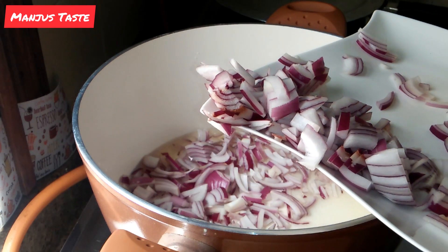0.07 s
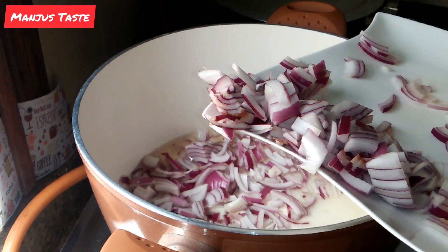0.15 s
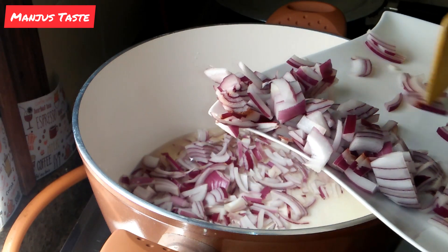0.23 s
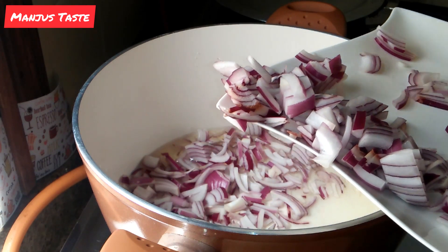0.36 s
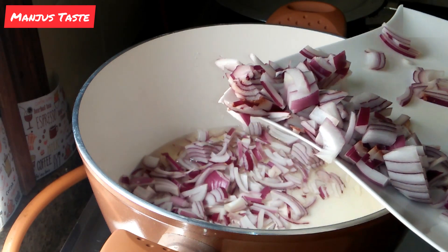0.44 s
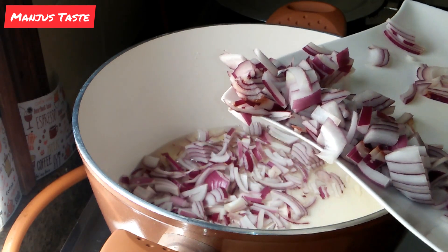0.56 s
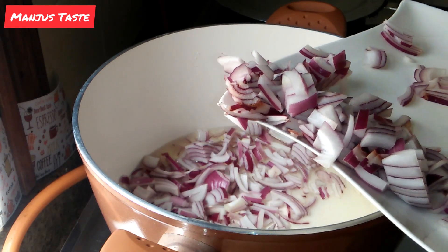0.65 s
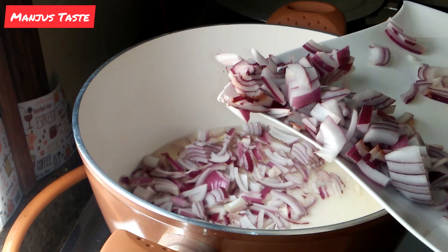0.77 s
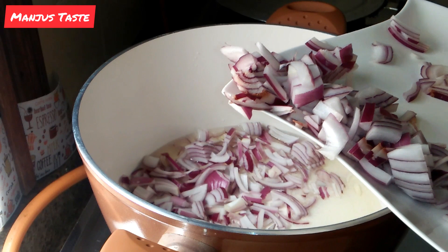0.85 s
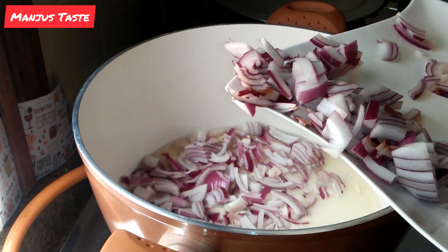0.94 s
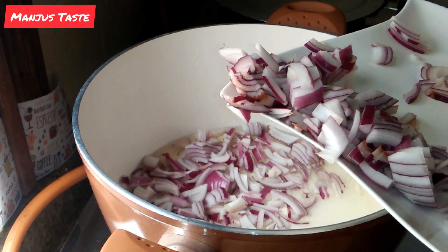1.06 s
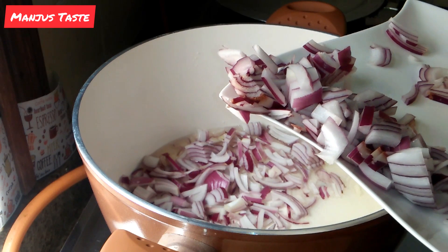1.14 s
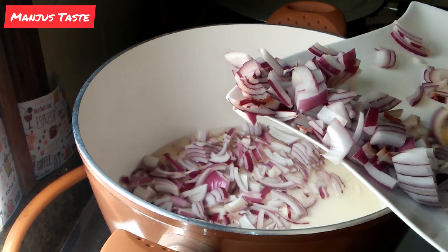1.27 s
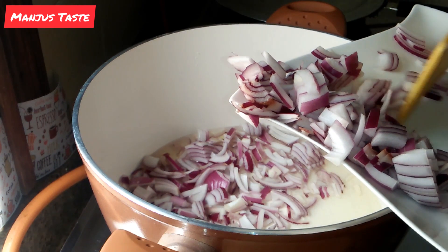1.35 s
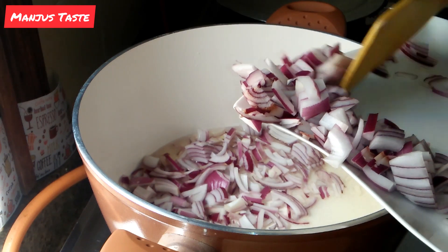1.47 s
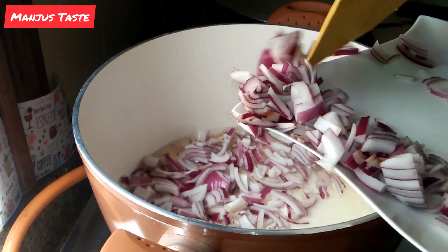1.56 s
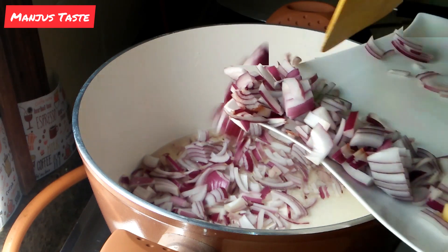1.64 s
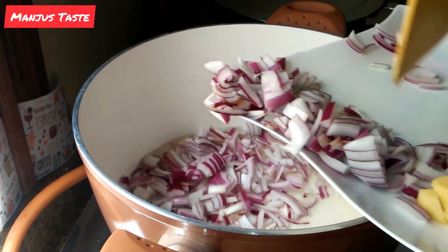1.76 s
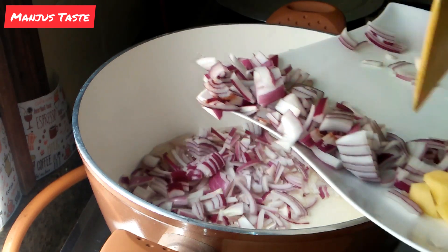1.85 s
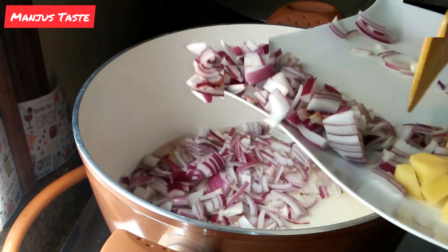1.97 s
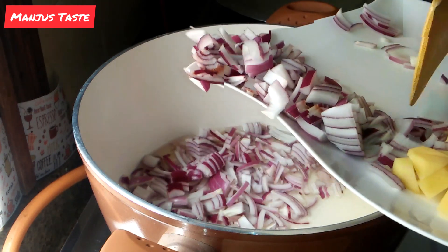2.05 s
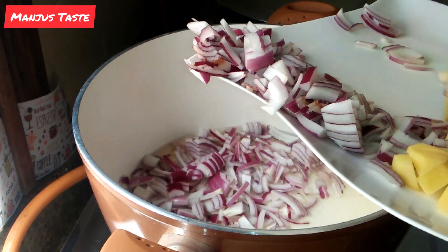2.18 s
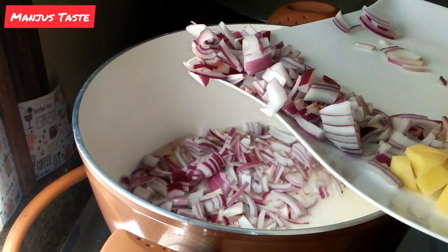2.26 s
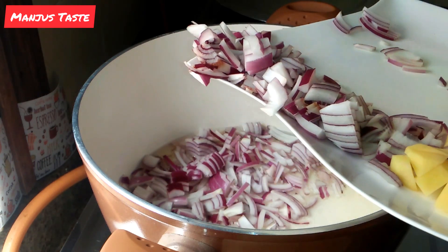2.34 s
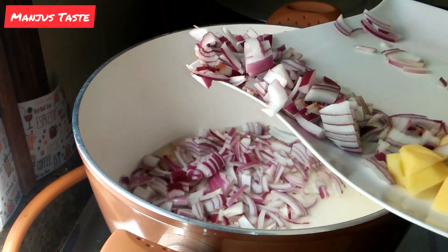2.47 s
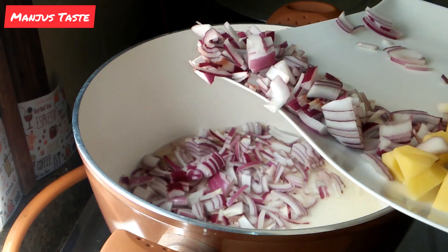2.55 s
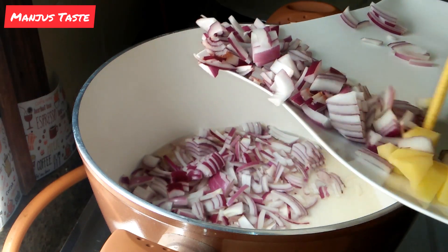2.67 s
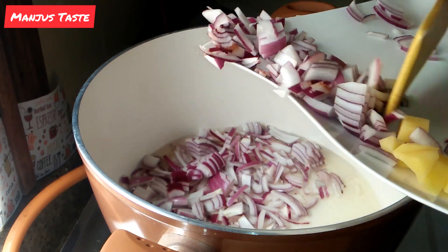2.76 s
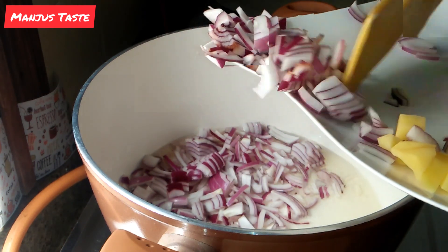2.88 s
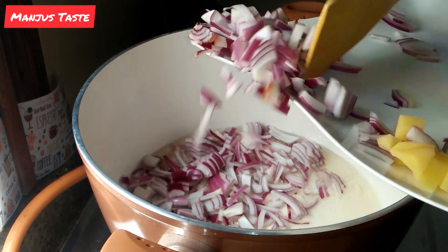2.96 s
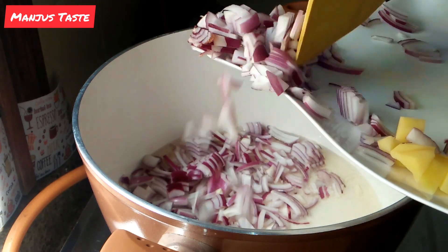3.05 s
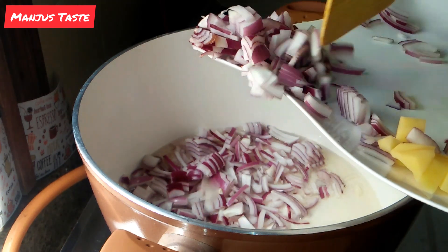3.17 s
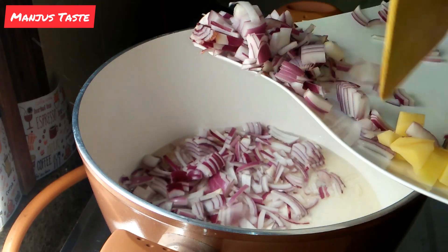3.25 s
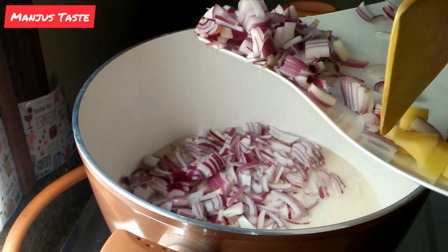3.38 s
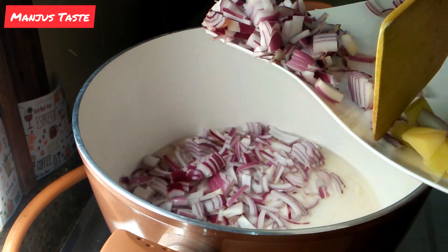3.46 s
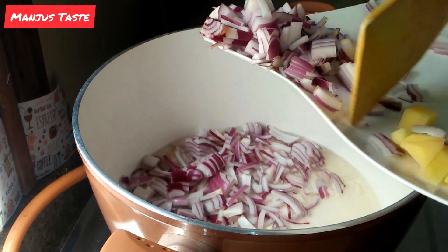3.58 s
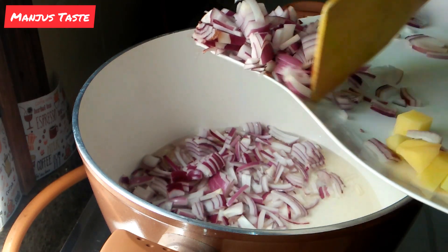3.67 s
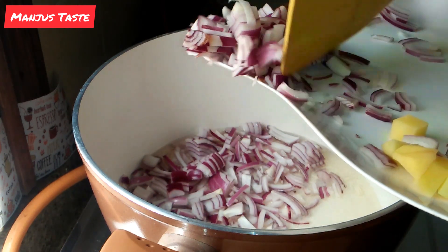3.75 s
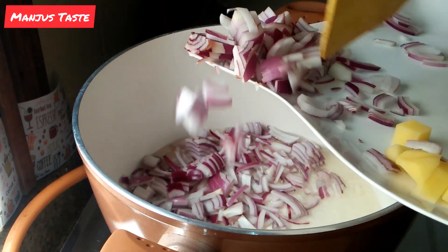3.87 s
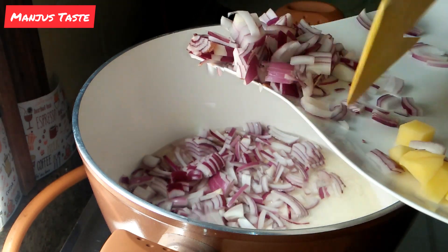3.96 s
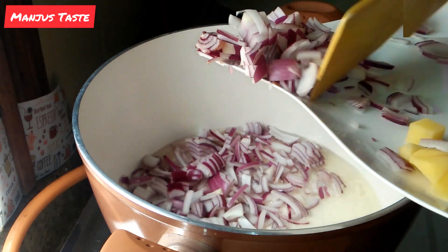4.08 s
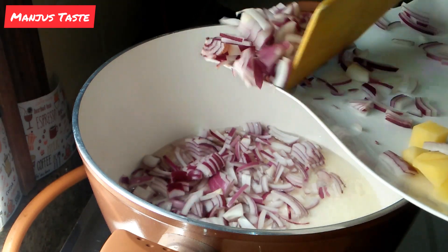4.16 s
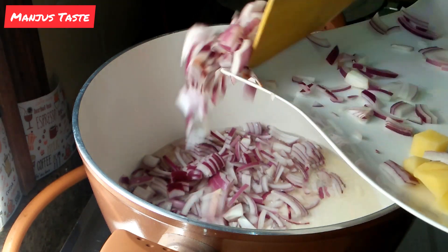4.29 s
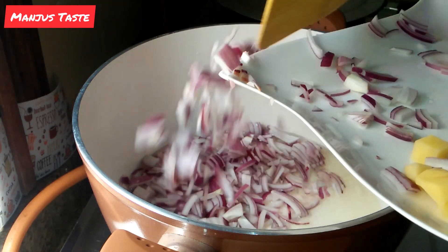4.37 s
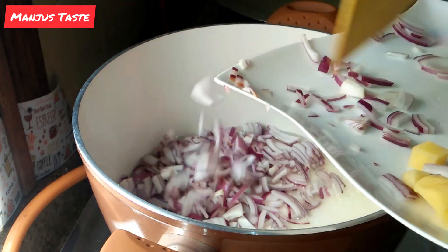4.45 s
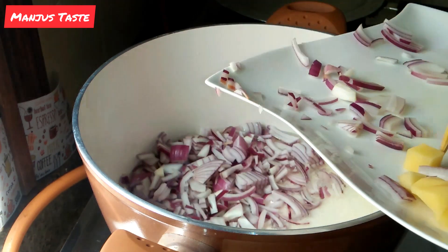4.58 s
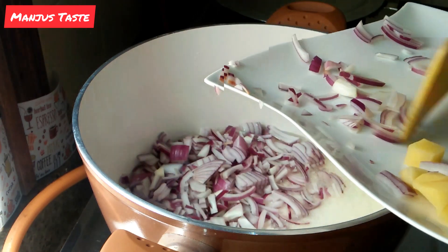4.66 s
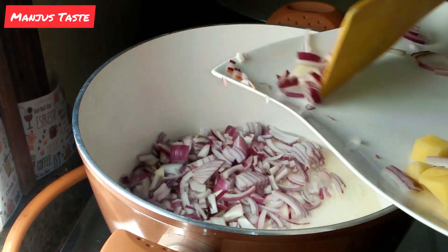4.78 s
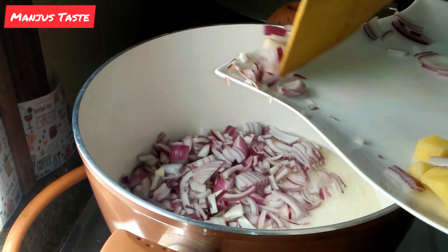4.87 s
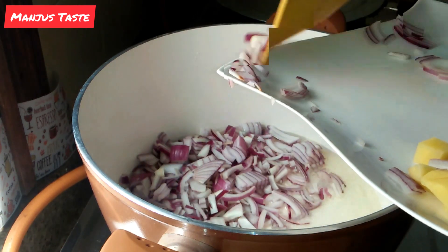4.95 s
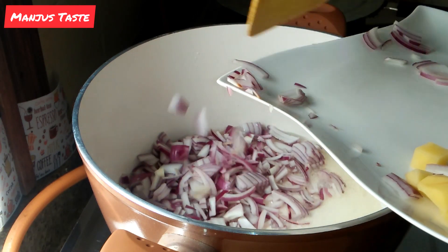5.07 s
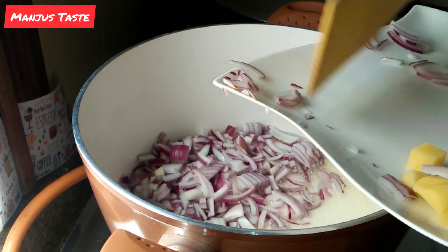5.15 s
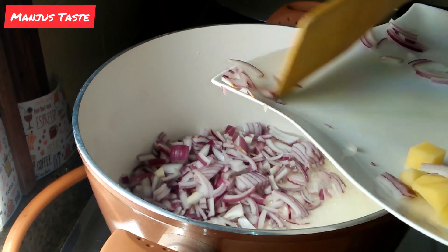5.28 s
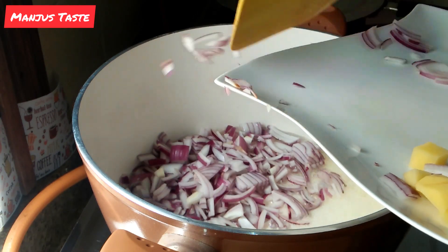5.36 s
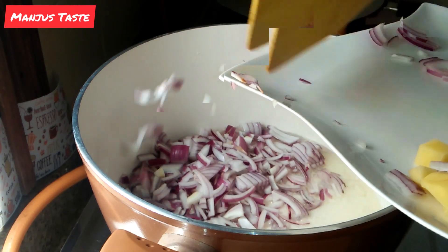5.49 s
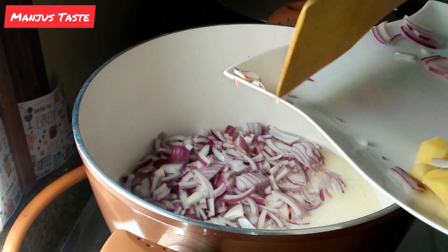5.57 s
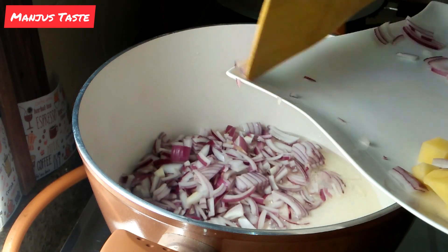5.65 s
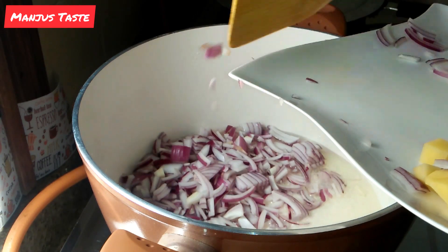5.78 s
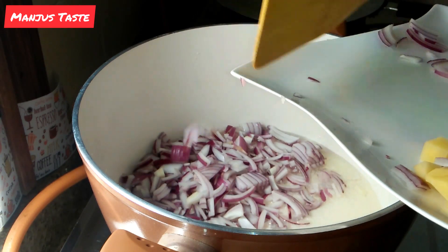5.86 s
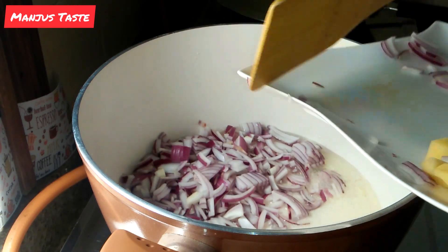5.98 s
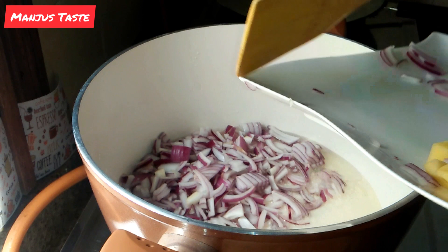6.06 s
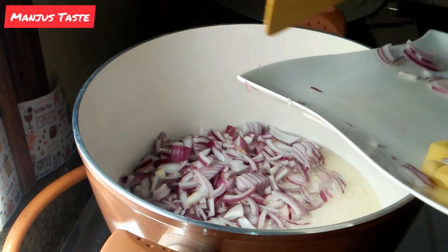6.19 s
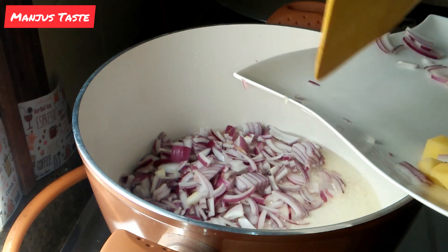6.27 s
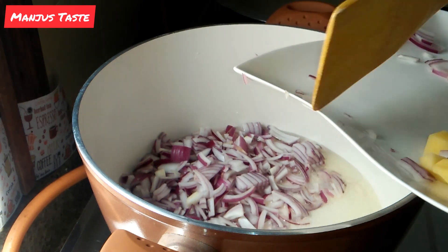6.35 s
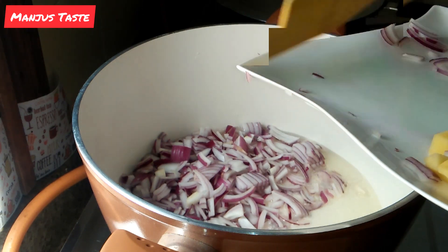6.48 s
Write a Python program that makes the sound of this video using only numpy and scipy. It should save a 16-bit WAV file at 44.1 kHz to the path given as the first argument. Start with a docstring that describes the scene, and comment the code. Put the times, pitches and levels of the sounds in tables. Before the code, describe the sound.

In a small hard-walled kitchen, a burst of oil hiss fades within half a second, leaving faint fizz and a low uneven appliance rumble. A wooden spatula raps a ceramic plate once, later repeatedly. Chopped onion drops into a metal pot with soft dull patters, thickest past the middle. Tiny spits crackle throughout. Close stereo microphone, bass centred, treble slightly wide.

```python
"""A hard-walled kitchen: an appliance rumbles low, a pot murmurs, and a flare of oil hiss dies down at the start.
Shaped noise makes these beds and the oil's fizz; from 0.4 s scattered spits ring as short filtered noise bursts.
At 1.3 s a wooden spatula taps a ceramic plate: decaying modes and a crack of noise; from 3.7 s taps come often.
From 1.9 s chopped onion drops into the metal pot as dull patters of pot modes, thickest between 4.1 and 4.7 s.
Two close microphone ports hear the same bass and a loosely related treble."""
import sys
import numpy as np
from scipy import signal
from scipy.fft import rfft, irfft, next_fast_len
from scipy.io import wavfile
from scipy.ndimage import uniform_filter1d, map_coordinates

SR = 44100
rng = np.random.default_rng(int(sys.argv[2]) if len(sys.argv) > 2 else 0)


def wav_out(sig):
    """Save sig, one row per channel (or a flat mono array), as 16-bit PCM at SR to the path in sys.argv[1]."""
    wavfile.write(sys.argv[1], SR, np.round(np.clip(np.atleast_2d(sig).T, -1, 1) * 32767).astype(np.int16))


def rack_gain(trim_db):
    """Turn a fader trim in dB into the linear factor to multiply a signal by."""
    fader = np.asarray(trim_db, float)
    return 10 ** (fader / 20)


N = 287701


def unit(x):
    """Scales a sound to rms 1."""
    return x / np.sqrt(np.mean(x ** 2) + 1e-20)


def along(points, hz):
    """Reads a (frequency, value) curve on a logarithmic frequency axis."""
    f, value = np.transpose(points)
    return np.interp(np.log(hz + 1), np.log(f + 1), value)


def fader(rows):
    """Draws a (time, level) table as one level per sample."""
    time_s, level = np.transpose(rows)
    return np.interp(np.arange(N) / SR, time_s, level)


def wobble(knots_per_s):
    """A smooth random curve through normal-distributed knots."""
    knots = rng.standard_normal(int(N * knots_per_s / SR) + 4)
    return map_coordinates(knots, [np.arange(N) * knots_per_s / SR])


def filtered(x, response):
    """Multiplies the spectrum of x by a response of frequency."""
    size = next_fast_len(N + 8192)
    return irfft(rfft(x, size) * response(np.fft.rfftfreq(size, 1 / SR)), size)[..., :N]


def rush(colour, patchy_db, crackle=0, peaks=()):
    """Two unrelated noises, jointly at rms 1, sharing patches of gain, sparse crackle and resonant peaks."""
    def response(hz):
        resonance = 1 + sum(rack_gain(db) / (1 + (2 * (hz - centre) / width) ** 2) for centre, width, db in peaks)
        return rack_gain(along(colour, hz)) * resonance

    grains = rng.exponential(1, N) * (rng.random(N) < 0.02)
    noise = rng.standard_normal((2, N)) * (1 + crackle * grains)
    z = signal.stft(noise, nperseg=512)[2]
    # blur a random gain map over frequency and time
    field = uniform_filter1d(rng.standard_normal(z.shape[1:]), size=10, axis=0)
    field = uniform_filter1d(field, size=10, axis=1)
    patchy = signal.istft(z * rack_gain(patchy_db * unit(field)), nperseg=512)[1][:, :N]
    return unit(filtered(patchy, response))


def ring(modes, attack_s):
    """A blow on decaying modes; neighbours swing oppositely, with strength and pitch varied each time."""
    t = np.arange(SR // 4) / SR
    spread = rng.standard_normal((len(modes), 2)) * [1.5, 0.005]  # dB, fraction of pitch
    total = np.zeros(len(t))
    for k, ((hz, db, t60), (extra_db, detune)) in enumerate(zip(modes, spread)):
        decay = rack_gain(db + extra_db - 60 * t / t60)
        total += (-1) ** k * decay * np.sin(2 * np.pi * hz * (1 + detune) * t)
    return (1 - np.exp(-t / attack_s)) * total


# how long the room's answer lasts: pitch_hz, t60_s
WALL_DECAY = [(500, 0.43), (1300, 0.39), (3500, 0.34), (9000, 0.37)]


def add(out, start_s, sound, wet_db, direct_side_db):
    """Places one event and the kitchen's answer, in which each frequency dies at its own speed."""
    hz, t, z = signal.stft(rng.standard_normal((2, SR // 2)), SR, nperseg=256)
    decay = rack_gain(-60 * t / along(WALL_DECAY, hz)[:, None])
    tail = signal.istft(z * decay, SR, nperseg=256)[1]
    age = np.arange(tail.shape[1]) / SR
    tail = tail * np.clip(age / 0.0008 - 0.5, 0, 1)  # the first wall answers late
    tail = tail * (1 + 0.59 * np.exp(-((age - 0.038) / 0.001) ** 2))  # the far wall returns a bundle of echoes
    tail = rack_gain(wet_db) * tail / np.linalg.norm(tail[0])
    tail[:, 0] = 1, rack_gain(direct_side_db)  # direct sound: shared part, unshared part
    heard = signal.fftconvolve(sound[None], tail, axes=1)
    room = out[:, round(start_s * SR):][:, :heard.shape[1]]
    room += heard[:, :room.shape[1]]


# rumble fader before its wobble: time_s, level_db
RUMBLE_FADER = [(0, -64.5), (.33, -65), (.85, -60), (1.0, -56.5), (1.25, -82.5), (1.33, -62), (1.7, -57),
                (1.92, -72), (2.02, -57.5), (2.36, -54), (2.52, -64), (2.7, -56), (3.25, -67),
                (3.35, -55.5), (3.56, -66), (3.71, -55), (3.84, -69.5), (4.02, -58.5), (4.34, -67),
                (4.54, -61.5), (5.1, -65.5), (5.2, -62), (5.48, -66), (5.77, -58.5), (6.02, -56.5),
                (6.45, -73), (6.52, -61)]
# rumble colour: pitch_hz, relative_db
RUMBLE_COLOUR = [(15, -33.5), (25, -31), (35, -13.5), (45, -11.5), (65, 2), (86, -3.5), (113, -0.5),
                 (125, -14.5), (140, -7.5), (227, -15.5), (260, -46), (340, -51), (570, -120)]
# narrow humps in the rumble: centre_hz, width_hz, added_gain_db
RUMBLE_HUMPS = [(64, 8.9, 5.5), (104.8, 17, 4)]
# murmur of the heated pot before its wobble: time_s, level_db
MURMUR_FADER = [(0.0, -67.5), (2.09, -65.5), (2.38, -63.5), (2.72, -63), (4.12, -68), (4.72, -63.5),
                (4.83, -65), (5.63, -68.5), (6.01, -63), (6.52, -73.5)]
# murmur colour: pitch_hz, relative_db
MURMUR_COLOUR = [(130, -38.5), (220, -21), (329, -2), (371, -20.5), (399, -5), (524, -13.5), (572, -17.5),
                 (764, -1), (1500, -20), (1950, -49), (3300, -120)]
# the pot's resonances in the murmur: centre_hz, width_hz, added_gain_db
MURMUR_RESONANCES = [(475.4, 31, 9), (584.3, 22, 15), (899, 40, 4.5), (1026, 19, 9.5)]
# steady far drone colour: pitch_hz, relative_db
DRONE_COLOUR = [(20, -0.5), (35, -2), (100, -7.5), (200, -0.5), (300, -10), (450, -58.5)]
# steady room air colour: pitch_hz, relative_db
AIR_COLOUR = [(710, -29), (1200, 3), (2750, -2), (3140, -8.5), (5350, -43), (6000, -22), (7800, -40),
              (13200, -120)]


def kitchen():
    """Shaped noise: lumpy low rumble, the pot murmuring in its resonances, a far drone and steady room air."""
    air = rack_gain(-69.5) * rush(AIR_COLOUR, patchy_db=4.7)
    drone = rack_gain(-75) * rush(DRONE_COLOUR, patchy_db=3.3)
    murmur_gain = rack_gain(fader(MURMUR_FADER) + 0.62 * wobble(5.1))
    murmur = murmur_gain * rush(MURMUR_COLOUR, patchy_db=2.5, peaks=MURMUR_RESONANCES)
    rumble_gain = rack_gain(fader(RUMBLE_FADER) + 1.5 * wobble(20) + 1.8 * wobble(10))
    rumble = rumble_gain * rush(RUMBLE_COLOUR, patchy_db=-1.5, peaks=RUMBLE_HUMPS)
    return air + drone + murmur + rumble


# fizz fader before its wobble: time_s, level_db
FIZZ_FADER = [(0, -47.5), (.4, -53.5), (.56, -59.5), (.83, -59.5), (1.1, -64), (1.4, -60), (1.6, -69.5),
              (1.9, -60.5), (2.27, -58), (2.75, -71), (2.94, -58), (3.18, -64), (3.43, -55.5),
              (3.69, -65.5), (4.03, -68.5), (4.19, -57), (4.45, -71), (4.67, -55.5), (4.97, -58.5),
              (5.2, -66), (5.5, -65), (5.72, -76), (6.0, -70.5), (6.14, -51.5), (6.35, -64.5),
              (6.52, -63.5)]
# fizz colour: pitch_hz, relative_db
FIZZ_COLOUR = [(3240, -42), (5500, -21.5), (6420, -2), (6870, -9), (7240, 0.5), (8290, 3.5), (10300, 2),
               (14200, -2)]
# hiss colour: pitch_hz, relative_db
HISS_COLOUR = [(1060, -59), (1800, -18.5), (2030, -11), (2360, -22), (2760, -5.5), (4010, -3), (7000, -2),
               (9100, -41.5), (15400, -120)]


def oil():
    """Hot oil as crackling noise: a high fizz, a lower hiss that swings partly along, and a flare dying down."""
    t = np.arange(N) / SR
    fizz_db = fader(FIZZ_FADER)
    fizz_gain = rack_gain(fizz_db + 1.58 * wobble(29) + 1.35 * wobble(3.2))
    fizz = fizz_gain * rush(FIZZ_COLOUR, patchy_db=2.0, crackle=0.76)
    # the flare sags at 12 dB/s, and by a further 61 dB/s after 0.4 s
    flare = rack_gain(-54 - 12 * t - 61 * np.maximum(t - 0.4, 0))
    follow_db = 0.34 * (fizz_db - fizz_db.mean())
    steady = rack_gain(-72.5 + follow_db + 1.5 * wobble(4))
    hiss_gain = (flare + steady) * rack_gain(0.29 * wobble(36))
    return fizz + hiss_gain * rush(HISS_COLOUR, patchy_db=2.0, crackle=2.3)


# bursting bubbles and small snaps, with one light spatula touch at 4.75 s: start_s,
# level_db (before a common trim), pitch_hz, sharpness_ratio (pitch over bandwidth of each of two resonances)
SPIT_EVENTS = [(0.401, -55.5, 1250, 7.4), (0.675, -50.5, 7900, 2.2), (1.163, -55.5, 9230, 3.6),
               (1.721, -38, 10000.0, 0.92), (1.8, -46, 8450, 4.3), (2.02, -52.5, 10900, 1.2),
               (2.042, -51.5, 5800, 3.1), (2.062, -46.5, 11800.0, 2.9), (2.152, -53, 9550, 6.5),
               (2.19, -54, 8400, 9.5), (2.238, -53.5, 3980, 8.3), (2.337, -55, 7330.0, 6.3),
               (2.381, -52.5, 6330, 8.0), (2.579, -58.5, 5970.0, 5.8), (2.733, -52.5, 8550, 1.0),
               (2.865, -43, 11200, 2.4), (2.915, -53, 4900, 6.2), (2.921, -49, 6500, 7.7),
               (3.0, -44, 7200, 2.3), (3.099, -55, 4660, 4.5), (3.488, -51.5, 1870, 2.6),
               (3.83, -46.5, 8980, 3.3), (4.013, -52, 11060, 0.53), (4.03, -48.5, 2790.0, 6.8),
               (4.155, -49.5, 8300, 6.5), (4.256, -50, 7000, 2.2), (4.485, -50, 10000.0, 1.2),
               (4.75, -49, 1930, 3.9), (5.156, -52, 13100, 3.9), (5.181, -52, 5900, 7.5),
               (5.314, -52.5, 7300, 3), (5.823, -58, 9000.0, 2.5), (5.948, -28, 9100, 0.18),
               (6.214, -46, 6300, 8.0), (6.418, -50.5, 9500.0, 3.5)]


def spits():
    """Bubbles, snaps and one light touch: milliseconds of noise ringing at a pitch, the least sharp being broad."""
    out, t = np.zeros((2, N)), np.arange(1024) / SR
    f = np.fft.rfftfreq(len(t), 1 / SR)
    for start_s, db, hz, sharpness in SPIT_EVENTS:
        noise = rng.standard_normal(len(t)) * np.exp(-t / 0.0044) * (t < 0.016)
        spectrum = rfft(noise)
        even = spectrum / np.abs(spectrum) ** 0.75  # flattens most of the burst's random unevenness
        damping = 1j * f * hz / sharpness
        resonance = (damping / (hz * hz - f * f + damping)) ** 2
        burst = unit(irfft(even * resonance))
        add(out, start_s, rack_gain(db - 11.0) * burst, wet_db=5.5, direct_side_db=-19.0)
    return out


# onion landings: start_s, level_db (before trims), upper_modes_db (added to the level for the upper modes)
ONION_DROPS = [(1.873, -38.5, -3.5), (3.219, -52, -1), (4.141, -47, -11), (4.215, -54, -17),
               (4.471, -58.5, 11), (4.507, -46, 0.5), (4.561, -49, 3), (4.599, -50.5, 7),
               (4.643, -46.5, -5), (5.27, -53, -8)]
# pot modes, the two low ones first: pitch_hz, level_db, t60_s
POT_MODES = [(470, 9.5, 0.072), (603, 6.5, 0.096), (1023, 22, 0.02), (846, -37, 0.011), (1250, 13, 0.019),
             (1585, 2, 0.038), (2040, 16, 0.011)]


def drops():
    """Soft pieces land in a patter of uneven sizes and set the pot's walls humming."""
    out = np.zeros((2, N))
    for start_s, db, upper_db in ONION_DROPS:
        patter = np.zeros(SR // 10)
        landings = (np.arange(6) * rng.random(6) * 0.012 * SR).astype(int)
        patter[landings] = rack_gain(-6 * rng.random(6) - np.arange(6))
        low = rack_gain(db - 11.5) * ring(POT_MODES[:2], attack_s=0.0024)
        upper = rack_gain(db + upper_db - 14.0) * ring(POT_MODES[2:], attack_s=0.0017)
        add(out, start_s, signal.fftconvolve(low + upper, patter), wet_db=1.0, direct_side_db=-6)
    return out


# taps: start_s, main_db (before a common trim), then family strengths against the main one:
# low_db, ring_db, high_db, top_db
SPATULA_TAPS = [(1.3466, -11.5, -25.5, -24, -20, -17), (2.63, -22, -25.5, -33.5, -26, -51),
                (3.696, -34.5, -7, -56, -40, -57), (4.1868, -30.5, -8, -29, -38, -24),
                (4.7687, -14.5, -24.5, -26, -13, -15.5), (5.0033, -24.5, -15.5, -34, -13.5, -34),
                (5.3732, -23.5, -8.5, -14, -15.5, -11.5), (5.7168, -26, -9, -64, -34.5, -42),
                (6.1171, -20.5, -11, -38, -14.5, -9), (6.5144, -16, -13.5, -34, -26, -12)]
# plate modes in six families (low, main, second, ring, high, top): pitch_hz, level_db, t60_s
PLATE_MODES = [
    [(314, -12, 0.03), (595, -1, 0.031), (824, 8, 0.022), (1087, 15, 0.02)],
    [(1088, -10, 0.078), (1186, 2.5, 0.019), (1299, 6.5, 0.027), (1403, 1.5, 0.027), (1518.5, -3, 0.061),
     (1644, -4, 0.045)],
    [(1933, 10, 0.022), (2077, 5, 0.029), (2255, 8, 0.0082)],
    [(2790, 18.5, 0.06)],
    [(3190, 9, 0.013), (3403, 5.5, 0.04), (3840, 4, 0.013), (4680, -9.5, 0.029)],
    [(4210, 2, 0.023), (4790, 1.5, 0.019), (5450, -2, 0.014), (5890, -1, 0.026), (6650, -7, 0.014),
     (7500, -4.5, 0.015), (8710, -9.5, .012), (10000, -23, 0.0089)],
]


def taps():
    """The blade's corner touches softly, then its edge strikes and cracks; each landing weights the modes."""
    out, t = np.zeros((2, N)), np.arange(SR // 4) / SR
    lead = round(0.00622 * SR)  # touch to strike, in samples
    for start_s, db, low_db, ring_db, high_db, top_db in SPATULA_TAPS:
        second_db = 0.49 * high_db  # the second family follows the high one
        family_db = [low_db, 0, second_db, ring_db, high_db, top_db]
        struck = [(hz, level + gain, t60) for gain, modes in zip(family_db, PLATE_MODES)
                  for hz, level, t60 in modes]
        touch = rack_gain(-32.5) * ring(PLATE_MODES[0] + PLATE_MODES[1], attack_s=0.0019)
        crack = rack_gain(top_db + 0.5 - 60 * t / 0.009) * rng.standard_normal(len(t))  # t60 9 ms
        strike = ring(struck, attack_s=0.00022) + crack
        blow = np.pad(strike, (lead, 0)) + np.pad(touch, (0, lead))
        add(out, start_s - lead / SR, rack_gain(db - 6.0) * blow, wet_db=2.0, direct_side_db=-5)
    return out


# gain on the part the ports do not share: pitch_hz, gain_db
PORT_DIFFERENCE = [(3000, -64), (4500, -16.5), (6500, -10.5), (9000, -3.5), (14000, -5.5)]


def scene():
    """Sums each source's shared and unshared parts; the ports differ only in the treble."""
    mid, apart = kitchen() + oil() + drops() + spits() + taps()
    side = filtered(apart, lambda hz: rack_gain(along(PORT_DIFFERENCE, hz)))
    return np.array([mid + side, mid - side])


def low_pass(x):
    """Removes everything above the highest recorded frequency."""
    return signal.sosfilt(signal.butter(12, 15310, fs=SR, output="sos"), x)


def record(dry):
    """Finishes the mix with a low-pass: the treble drops steeply by 40 dB around top_hz."""
    top_hz, slope_hz = 14380, 20
    finished = filtered(dry, lambda hz: rack_gain(-40 / (1 + np.exp((top_hz - hz) / slope_hz))))
    return low_pass(finished)


dry = scene()
out = record(dry)
wav_out(out)
```